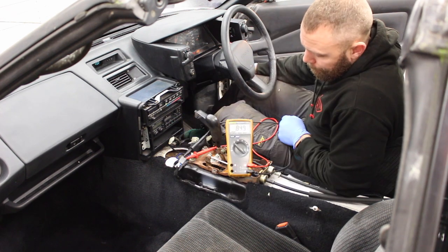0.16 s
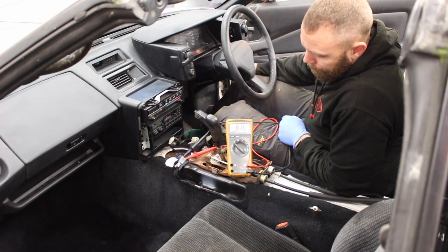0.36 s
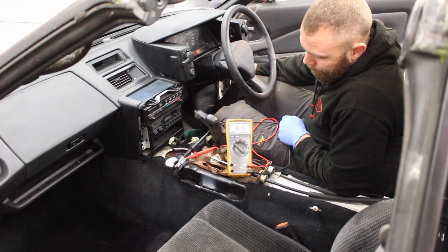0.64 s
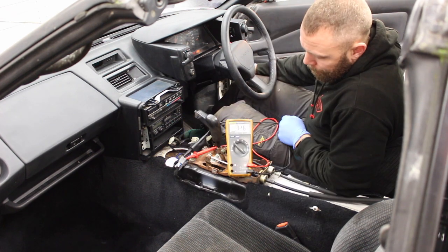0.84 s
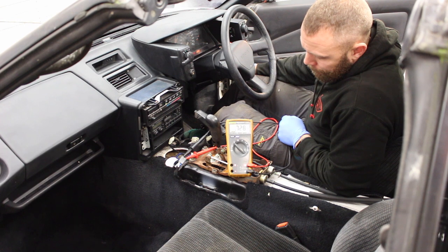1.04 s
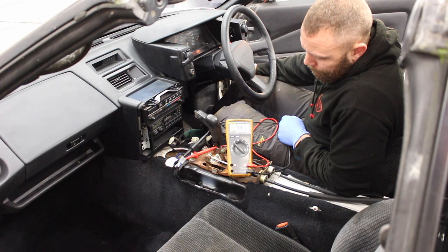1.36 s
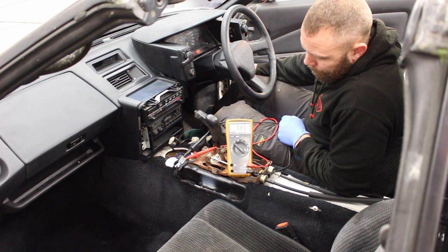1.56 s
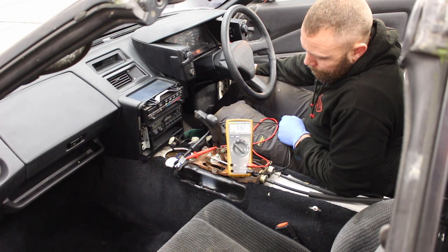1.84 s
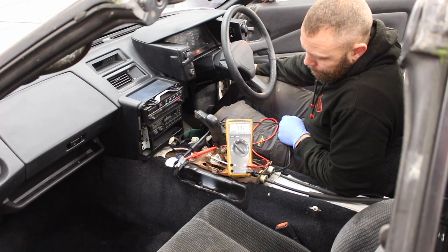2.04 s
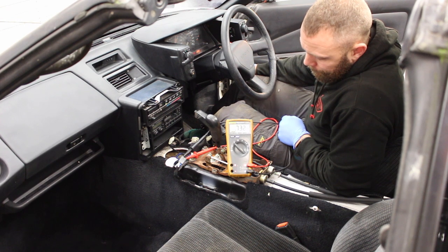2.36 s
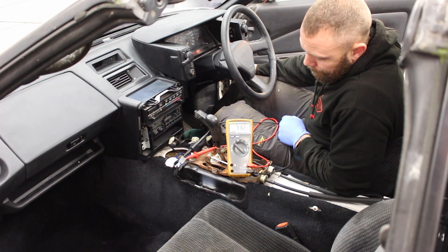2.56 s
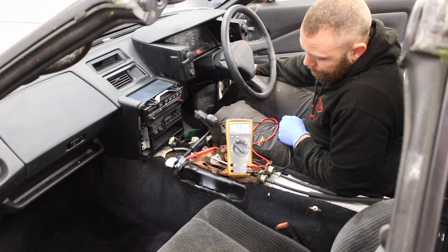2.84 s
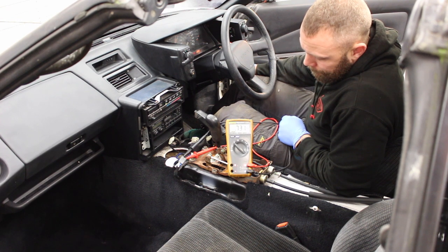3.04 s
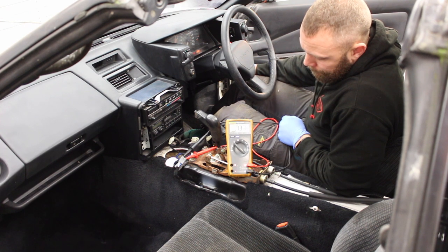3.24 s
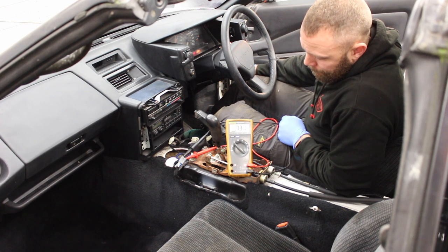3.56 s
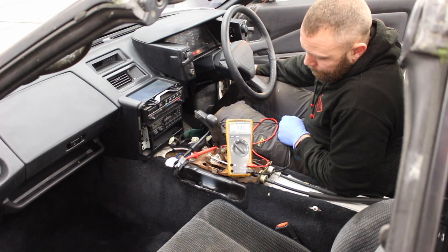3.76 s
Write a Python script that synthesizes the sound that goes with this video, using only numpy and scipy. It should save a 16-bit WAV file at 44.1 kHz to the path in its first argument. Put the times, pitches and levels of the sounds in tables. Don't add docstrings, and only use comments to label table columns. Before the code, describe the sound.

A car starter cranks a dead engine: faint key ticks, a hard metallic clunk, then rapid even whining pulses with gear chatter, until the key is released. Microphone by the open door in a garage.

```python
import sys
import numpy as np
from scipy import signal
from scipy.fft import rfft, irfft, next_fast_len
from scipy.io import wavfile
from scipy.ndimage import uniform_filter1d

SR = 44100
rng = np.random.default_rng(int(sys.argv[2]) if len(sys.argv) > 2 else 0)


def how_loud(loudness_db):
    steps = np.asarray(loudness_db, float) / 20
    return 10 ** steps


def materialize(psi):
    bounded = np.clip(np.atleast_2d(psi).T, -1, 1)
    quanta = np.round(bounded * 32767).astype(np.int16)
    wavfile.write(sys.argv[1], SR, quanta)


N = 171990

# frequency in Hz, level in dB per Hz.
ROOM_TONE = [(18, -48), (30, -14), (81, -10), (379, -10), (420, -15), (691, -12), (1770, -21.5),
             (4780, -20.5), (15500, -33)]
# time in seconds, level in dB.
KEY_TICKS = [
    (.018, -59),
    (.066, -50.5),
    (.092, -48),
]
KEY_BARREL_HZ = [3260, 4750]
# time in seconds, level in dB.
STARTER_POWER = [
    (.112, -46),
    (.122, -32),
    (.136, -18),
    (.143, -3.5),
    (3.58, -7),
    (3.64, -13.5),
    (3.72, -22),
    (3.9, -24.5),
]
# time in seconds, peak level in dB.
STROKES = [(0.138, -6.5), (0.381, -6.5), (0.57, -6), (0.729, -7.5), (0.874, -6), (1.018, -5.5),
           (1.16, -5.5), (1.313, -6), (1.455, -6.5), (1.6, -6), (1.742, -6.5), (1.893, -7.5), (2.041, -8),
           (2.186, -7.5), (2.332, -6), (2.482, -7), (2.625, -6), (2.769, -6), (2.911, -7), (3.063, -7),
           (3.214, -6), (3.357, -7), (3.506, -4.5)]
# share of the stroke, tooth rate in Hz, load in dB.
STROKE_SHAPE = [
    (0, 381.9, 1),
    (0.048, 371.1, 0),
    (0.151, 360, 3),
    (.28, 326.7, 2.5),
    (0.418, 312.3, 0),
    (0.601, 291.7, -1),
    (0.718, 286.3, -6.5),
    (.85, 310.9, -3.5),
    (.96, 329.6, -5),
]
# time in seconds, share of normal speed, whine in dB, teeth in dB.
MOTOR_SPEED = [
    (.14, 0.95, -17, 0),
    (.33, .72, -1, 7),
    (.4, 0.94, -0.5, 0),
    (.5, .85, 0, 0.5),
    (.6, 0.91, -1.5, 7.5),
    (.8, 0.99, -3.7, 1),
    (3.45, 0.98, -1.8, -1.7),
    (3.56, 0.86, -4, 5.5),
    (3.7, 1.07, -8.5, -11),
]
# time in seconds, level in dB.
PINION_BLOWS = [
    (.141, -5.5),
    (0.148, -2),
    (.160, -38),
    (0.169, -4.5),
    (.178, -33),
]
# frequency in Hz, width in Hz, level in dB.
BLOCK_MODES = [(311.4, 28, 0.5), (428.7, 20, -5), (711, 21, -6.5), (904.4, 13.3, -0.5), (1171, 17, 5),
               (1290.6, 11, 9), (1376, 8.7, 6), (1409, 14.5, 5.5), (1581, 47, 1), (1636, 63, -10)]
# frequency in Hz, width in Hz, level in dB.
GEAR_MODES = [(2423, 24, -4), (2515, 20, -1), (2680, 55, -4), (2850, 26.5, 3), (3060, 29, -1.5),
              (3113, 28, 0.5), (3260, 80, -3), (3668, 103, -6), (3746, 8.3, 1.5), (3852, 17, 5.5),
              (4190, 5.6, 2), (4465, 38, -8.5), (4913, 65, -9), (5195, 26, -7.5)]
# frequency in Hz, level in dB per Hz.
RATTLE_COLOUR = [(170, -47), (400, -10.5), (1200, 0.5), (2000, -5), (3600, -2), (7000, -17.5), (10000, -20),
                 (15500, -32.5)]
# delay in seconds, frequency in Hz, width in Hz, level in dB.
SLACK_KNOCKS = [
    (.001, 307, 94, -25),
    (.009, 426, 83, -24.5),
    (.011, 711, 70, -22.5),
    (.034, 315.2, 59.5, -19.5),
    (.06, 904.3, 70, -30.5),
]


def rms_one(x):
    return x / np.sqrt(np.mean(x ** 2) + 1e-20)


def drift(rate_hz):
    r = np.exp(-2 * np.pi * rate_hz / SR)
    noise = rng.standard_normal(N + SR)
    return rms_one(signal.lfilter([1], [1, -2 * r, r * r], noise)[SR:])


def resonance(x, hz, width_hz):
    r = np.exp(-np.pi * width_hz / SR)
    poles = [1, -2 * r * np.cos(2 * np.pi * hz / SR), r * r]
    return signal.lfilter([(1 - r * r) / 2, 0, (r * r - 1) / 2], poles, x + 1e-18)


def colour(x, points):
    hz, db = np.transpose(points)
    edges = 25 * 2 ** np.arange(0, 9.6, .5)
    out = 0
    for k, (lo, hi) in enumerate(zip(edges, edges[1:])):
        band = signal.sosfilt(signal.butter(2, [lo, hi], "band", fs=SR, output="sos"), x)
        gain_db = np.interp(np.log(lo * hi) / 2, np.log(hz), db, left=db[0] - 20)
        out = out + (-1) ** k * how_loud(gain_db) * band
    return out


def clicks(marks, spread_db):
    return marks * how_loud(spread_db * np.minimum(rng.exponential(1, N), 5))


def metal(x):
    block_db = -2.02
    modes = [(hz, width, db + block_db) for hz, width, db in BLOCK_MODES] + list(GEAR_MODES)
    top_db = max(db for _, _, db in BLOCK_MODES)
    return sum((-1) ** k * how_loud(db - top_db) * resonance(x, hz, width) for k, (hz, width, db) in enumerate(modes))


def room_tone():
    return how_loud(-50) * rms_one(colour(rng.standard_normal(N), ROOM_TONE))


def key():
    s, db = np.transpose(KEY_TICKS)
    ticks = np.zeros(N)
    ticks[(s * SR).astype(int)] = how_loud(db)
    burst = signal.lfilter([1], [1, -.997], ticks) * rng.standard_normal(N)
    return sum(7.9 * resonance(burst, hz, 230) for hz in KEY_BARREL_HZ)


def cranking():
    last_stroke_s = .146
    t = np.arange(N) / SR
    s, peak_db = np.transpose(STROKES)
    turn = np.interp(t, np.append(s, s[-1] + last_stroke_s), np.arange(len(s) + 1) * 1.)
    share, tooth_hz, load_db = np.transpose(STROKE_SHAPE)
    place = np.where(t < s[-1] + .6 * last_stroke_s, turn % 1, .6)
    speed = np.interp(t, *np.transpose(MOTOR_SPEED)[:2])
    rate = np.interp(place, share, tooth_hz, period=1) * speed
    load = np.interp(place, share, load_db, period=1)
    level = np.interp(t, s + 0.013, peak_db) + np.interp(t, *np.transpose(STARTER_POWER))
    return rate, load, level


def shell(load):
    boom_hz, boom_db, rumble_db = 67.8, -37.5, -47
    t = np.arange(N) / SR
    swell = uniform_filter1d(load, size=900)
    boom = np.sin(2 * np.pi * boom_hz * t + 1.4 * drift(4.9)) * how_loud(boom_db + 1.3 * swell)
    low = signal.butter(4, [22, 120], "band", fs=SR, output="sos")
    rumble = how_loud(rumble_db) * rms_one(signal.sosfilt(low, rng.standard_normal(N)))
    power_db = np.interp(t, *np.transpose(STARTER_POWER))
    return how_loud(0.34 * power_db) * (boom + rumble)


def tooth_hits(turns, load):
    hits = clicks(np.diff(np.floor(turns), prepend=0), spread_db=-4)
    hits = hits * how_loud(0.2 * load + 3.5 * drift(57))
    bright = metal(resonance(hits, 360, 750))
    dull = resonance(resonance(hits, 274, 164), 187, 194)
    return rms_one(bright + 0.22 * dull)


def motor_whine(rate, turns, load):
    per_tooth, octave_db, armature_per_tooth = 4.4, -10, .3
    phase = 2 * np.pi * per_tooth * np.cumsum(rate) / SR + .4 * drift(60)
    whine = np.sin(phase) + how_loud(octave_db) * np.sin(2 * phase)
    whine = whine * how_loud(1.67 * load + 2.0 * drift(60))
    whine = whine * (1 + .45 * np.sin(2 * np.pi * armature_per_tooth * turns + drift(11.4)))
    return rms_one(metal(whine) + 0.28 * whine)


def loose_rattle(load):
    per_s, split_hz = 9000, 1130
    grains = clicks(rng.random(N) < per_s / SR, spread_db=2.5) * rng.choice([-1, 1], N)
    grains = rms_one(colour(grains * how_loud(0.5 * drift(27)), RATTLE_COLOUR))
    low = signal.sosfilt(signal.butter(2, split_hz, fs=SR, output="sos"), grains)
    return 1.37 * (low * how_loud(1.44 * load) + (grains - low) * how_loud(1.1 * load))


def metal_scrape(load):
    return rms_one(metal(rng.standard_normal(N) * how_loud(load + 1.92 * drift(31))))


def starter(rate, load, level):
    teeth_db, whine_db, rattle_db, scrape_db = -20.5, -9.5, -14, -10
    t = np.arange(N) / SR
    turns = np.cumsum(rate * (1 + 0.0086 * drift(300))) / SR
    s, _, whine_course, teeth_course = np.transpose(MOTOR_SPEED)
    teeth = tooth_hits(turns, load) * how_loud(teeth_db + np.interp(t, s, teeth_course))
    whine = motor_whine(rate, turns, load) * how_loud(whine_db + np.interp(t, s, whine_course))
    rattle = how_loud(rattle_db) * loose_rattle(load)
    scrape = how_loud(scrape_db) * metal_scrape(load)
    return how_loud(level) * (teeth + whine + rattle + scrape)


def engagement():
    t60_s, thud_hz, thud_width_hz, thud_db = 0.076, 481, 570, -2
    squeal_s, squeal_length_s, squeal_hz, squeal_db = 0.303, 0.018, 3885, -14
    t = np.arange(N) / SR
    shape = sum(how_loud(db - 60 * np.maximum(t - s, 0) / t60_s) * (t >= s) for s, db in PINION_BLOWS)
    shape = signal.lfilter([.012], [1, -.988], shape)
    clatter = rms_one(colour(rng.standard_normal(N), RATTLE_COLOUR))
    thud = rms_one(resonance(rng.standard_normal(N), thud_hz, thud_width_hz))
    chirp = np.exp(-((t - squeal_s) / squeal_length_s) ** 2)
    surround = 0.27 * np.exp(-((t - squeal_s) / 0.1) ** 4)
    squeal = np.sin(2 * np.pi * squeal_hz * t + .5 * drift(30)) * (chirp + surround)
    return 0.31 * shape * (clatter + how_loud(thud_db) * thud) + how_loud(squeal_db) * squeal


def garage(x):
    t60_s, wall_cut_hz = 0.47, 3300
    size = next_fast_len(N + 2 * SR)
    w = 2 * np.pi * np.arange(size // 2 + 1) / size
    dull = 1 / (1 + 1j * w * SR / (2 * np.pi * wall_cut_hz)) ** 0.16
    echoes = 0
    for k, delay in enumerate(np.round(rng.uniform(.02, .05, 10) * SR)):
        loop = how_loud(-60 * delay / SR / t60_s) * dull * np.exp(-1j * w * delay)
        echoes = echoes + (-1) ** k * loop / (1 - loop)
    return irfft(rfft(x, size) * echoes, size)[:N] / 3


def knocks():
    spread_db, jitter_s = 1.2, .0007
    s, peak_db = np.transpose(STROKES[3:-1])
    out = 0
    for delay, hz, width_hz, db in SLACK_KNOCKS:
        late, strength = rng.standard_normal((2, len(s)))
        blows = np.zeros(N)
        blows[((s + delay + jitter_s * late) * SR).astype(int)] = how_loud(peak_db + db + spread_db * strength)
        out = out + resonance(resonance(blows, hz, width_hz), hz, width_hz) * SR / width_hz
    return out


def scene():
    rate, load, level = cranking()
    engine = engagement() + starter(rate, load, level) + knocks()
    echo = how_loud(-13) * garage(engine)
    return (room_tone() + key() + shell(load) + engine + echo)[None]


def low_pass(x):
    return signal.sosfilt(signal.butter(12, 15780, fs=SR, output="sos"), x)


def record(dry):
    headroom = 1.4
    mix = headroom * np.tanh(dry / headroom)
    return low_pass(mix)


dry = scene()
out = record(dry)
materialize(out)
```